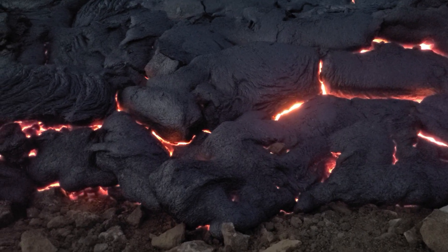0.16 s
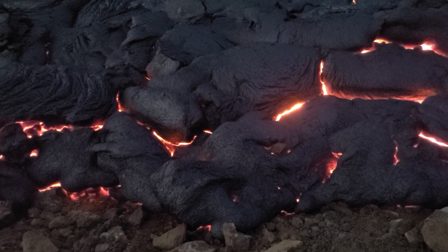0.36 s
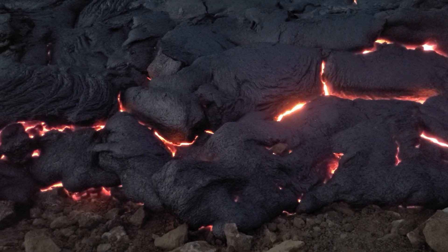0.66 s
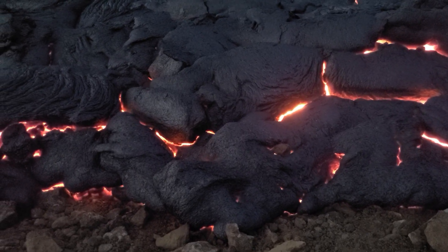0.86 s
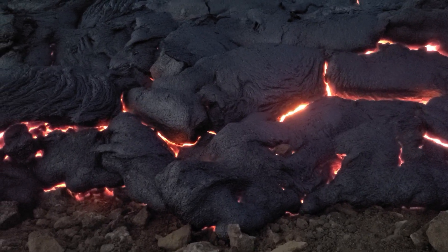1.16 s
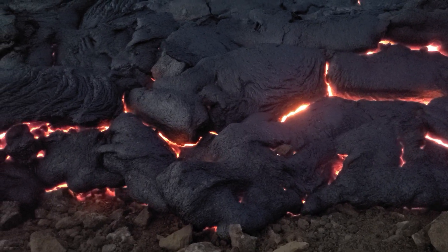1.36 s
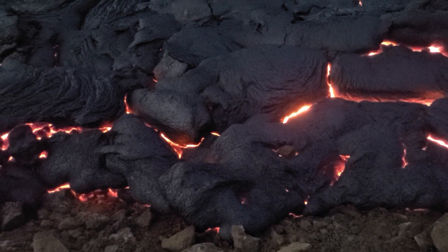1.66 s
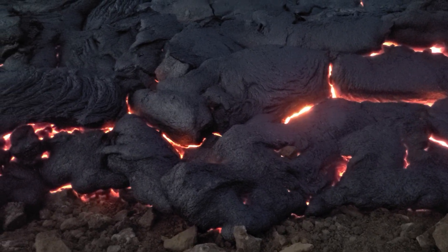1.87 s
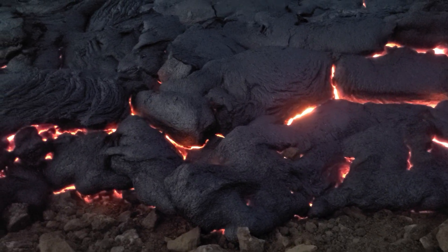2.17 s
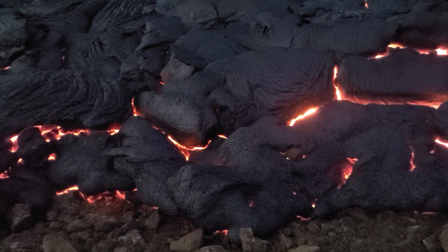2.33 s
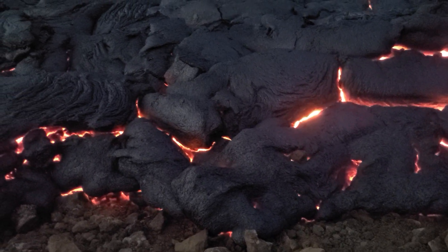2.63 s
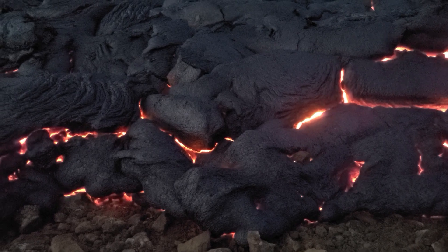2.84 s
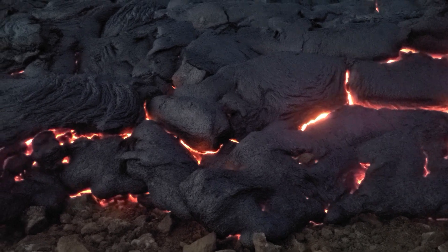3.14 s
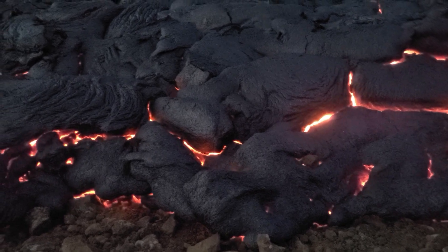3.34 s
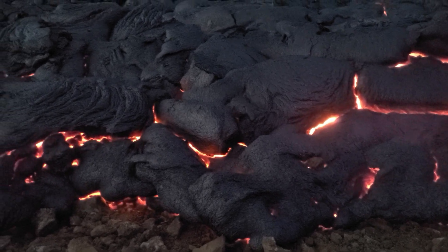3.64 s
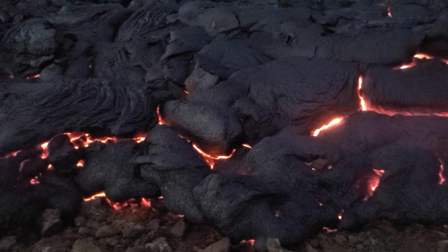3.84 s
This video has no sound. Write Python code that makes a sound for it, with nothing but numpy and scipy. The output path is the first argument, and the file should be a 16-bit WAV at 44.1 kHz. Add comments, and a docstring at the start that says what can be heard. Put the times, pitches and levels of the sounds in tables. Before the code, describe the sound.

Glassy lava flakes crack off with short bright ticks, the sharpest at 1.2 and 1.6 seconds, plus small dull crunches. Wind in the open air increasingly thumps the unshielded stereo microphone, roughest near the end.

```python
"""Wind rumbles gently on two microphone ports, over a faint hiss and a fine ticking. The glassy crust of
a slow lava flow is cooling in the open air: flakes snap off with short, bright pings, each a noise burst
with decaying partials, and thicker pieces crunch and knock. The wind is band-shaped noise that follows
level curves; its gusts grow rougher and brighter towards the end, with sharp eddies slapping the ports."""
import sys
import numpy as np
from scipy import signal
from scipy.fft import rfft, irfft, next_fast_len
from scipy.io import wavfile
from scipy.ndimage import uniform_filter1d, map_coordinates

SR = 44100
rng = np.random.default_rng(int(sys.argv[2]) if len(sys.argv) > 2 else 0)


def dump_mix(stems):
    """Bounce the given channels to the path in sys.argv[1] as a 16-bit WAV at rate SR."""
    frames = np.atleast_2d(stems).T  # one column per channel
    limited = np.clip(frames, -1, 1)  # hard clip at full scale
    pcm = np.round(limited * 32767).astype(np.int16)
    wavfile.write(sys.argv[1], SR, pcm)


N = 176400  # length in samples
TOP_HZ = 16200  # upper band limit of the recorder and of the ringing partials
WIND_ALIKE = 0.34  # sets the left-right correlation of the turbulence


def amp(db):
    """Logarithmic level: decibels become an amplitude gain."""
    return 10 ** (np.asarray(db) / 20)


def unit(x):
    """Power normalisation: x is scaled to an rms of 1."""
    return x / np.sqrt(np.mean(x ** 2) + 1e-20)


def pan(left_right_db):
    """Interaural level difference: half is given to the left gain and taken from the right."""
    return amp(np.vstack([left_right_db, -left_right_db]) / 2)


def curves(rows):
    """Linear interpolation: each column after the time becomes one value per sample."""
    time_s, *columns = np.transpose(rows)
    return [np.interp(np.arange(N) / SR, time_s, column) for column in columns]


def wobble(rate_hz):
    """Band-limited fluctuation: a smooth curve through rate_hz random knots a second."""
    knots = rng.standard_normal(int(N * rate_hz / SR) + 4)
    return map_coordinates(knots, [np.arange(N) * rate_hz / SR])


def filtered(x, response):
    """Linear filtering: the spectrum of x is multiplied by a response of frequency."""
    size = next_fast_len(N + SR // 2)
    spectrum = rfft(x, size) * response(np.fft.rfftfreq(size, 1 / SR))
    return irfft(spectrum, size)[..., :N]


def colour(x, spectrum):
    """Spectral shaping: levels are interpolated over log frequency, with silence outside the points."""
    points_hz, points_db = np.transpose(spectrum)

    def response(hz):
        return amp(np.interp(np.log(hz + 1), np.log(points_hz), points_db, left=-120, right=-120))

    return filtered(x, response)


def white(alike):
    """Partial coherence: a shared and an opposed white noise mix to a left-right correlation of alike."""
    shared, opposed = rng.standard_normal((2, N))
    turn = np.arccos(np.clip(alike, -1, 1)) / 2
    return np.cos(turn) * shared + np.sin(turn) * np.array([opposed, -opposed])


def noise(spectrum, alike):
    """Stationary random sound: coloured stereo noise of rms 1."""
    return unit(colour(white(alike), spectrum))


def add(track, start_s, sound):
    """Superposition: a sound is summed into the track at start_s."""
    part = track[:, max(round(start_s * SR), 0):][:, :sound.shape[-1]]
    part += sound[..., :part.shape[-1]]


def eddies(spectrum, even_s, lumps_db):
    """Turbulent pressure: one eddy size pushes lumpily on each port, of even strength over even_s."""
    pushes = unit(colour(white(WIND_ALIKE) * amp(lumps_db), spectrum))
    window = signal.windows.hann(int(even_s * SR))
    power = signal.fftconvolve(np.mean(pushes ** 2, axis=0), window, "same")
    return unit(pushes / np.sqrt(np.abs(power) + 1e-9))


# wind strength by eddy size, before the offsets below: time_s, rumble_db, buffet_db, flutter_db
WIND_LEVELS = [(0.0, -52.5, -67, -81), (0.659, -50.5, -72.5, -69.5), (0.733, -35.5, -62, -78),
               (0.773, -47, -62.5, -81), (1.187, -46.5, -66.5, -82), (1.212, -32, -67, -72.5),
               (1.322, -52.5, -70, -82.5), (1.412, -44, -63, -74), (1.482, -25.5, -31, -60.5),
               (1.576, -26, -43, -80), (1.601, -36, -59, -72), (1.691, -22, -43.5, -64),
               (1.746, -29.5, -40, -93.5), (1.881, -21.5, -43, -69.5), (1.906, -28, -25, -47.5),
               (1.985, -27.5, -36.5, -61.5), (2.075, -37, -30, -56), (2.115, -55, -44.5, -77.5),
               (2.15, -14, -27.5, -47.5), (2.19, -15.5, -37.5, -66.5), (2.235, -41, -67, -84),
               (2.27, -28.5, -21.5, -58), (2.31, -32.5, -58, -92), (2.365, -41.5, -30.5, -56),
               (2.424, -23.5, -25.5, -33), (2.444, -31.5, -30.5, -40), (2.559, -36.5, -31.5, -42.5),
               (2.609, -22.5, -40.5, -69), (2.669, -40.5, -67, -79.5), (2.704, -20, -49, -88),
               (2.748, -34, -54.5, -83), (2.81, -22, -24.5, -35), (2.835, -26, -34.5, -50.5),
               (2.868, -21.5, -29, -36.5), (2.903, -44, -60.5, -82), (2.958, -22.5, -33.5, -64),
               (2.998, -42.5, -42, -64), (3.053, -23, -33.5, -74), (3.148, -28.5, -38, -73),
               (3.193, -38.5, -50, -81), (3.223, -16, -41.5, -52), (3.283, -27, -49, -80),
               (3.372, -28.5, -40.5, -73), (3.408, -18, -18, -36.5), (3.456, -30.5, -28, -42),
               (3.49, -29, -39, -55.5), (3.562, -33, -20, -47), (3.582, -38, -42.5, -60.5),
               (3.607, -19, -20.5, -33), (3.665, -31, -27, -30), (3.705, -26.5, -30, -38),
               (3.735, -44, -16.5, -32), (3.785, -32.5, -26.5, -38.5), (3.851, -30, -33.5, -39.5),
               (3.875, -31, -21.5, -35), (3.926, -28.5, -31.5, -25), (3.986, -32, -25, -28)]
# wind veering from port to port: time_s, left_right_db
PORT_BALANCE = [(0.27, -2), (0.45, 4.5), (0.73, 1.5), (0.82, 10), (1.15, 10), (1.44, -6), (1.72, -10),
                (1.93, 1), (2.17, -4.5), (2.45, -0.5), (3.38, -4), (3.8, 0)]
# relative spectral density of the steady breeze, then of eddies from large to small: frequency_hz, density_db
BREEZE_SPECTRUM = [(15, -11.5), (35, -1), (60, 3), (100, -10.5), (200, -26.5), (400, -42.5)]
RUMBLE_SPECTRUM = [(22, -21), (42, -7.5), (60, -1), (100, -5.5), (150, -19.5), (230, -39.5), (400, -73.5)]
BUFFET_SPECTRUM = [(70, -19.5), (135, 2), (200, 6), (270, -3.5), (380, -30), (600, -54.5)]
CHURN_SPECTRUM = [(150, -32), (270, -1.5), (340, -0.5), (410, -5.5), (520, -27.5), (800, -65)]
FLUTTER_SPECTRUM = [(200, -28.5), (350, -2.5), (460, 3), (600, -5), (780, -12.5), (1000, -31), (1250, -34),
                    (1800, -49)]
BREEZE_DB = -44
RUMBLE_OFFSET_DB, BUFFET_OFFSET_DB, CHURN_OFFSET_DB, FLUTTER_OFFSET_DB = 1.5, 0.5, 0.5, -1.5


def wind():
    """Scales of turbulence: breeze and large eddies rumble throughout, smaller eddies join in the gusts."""
    rumble_db, buffet_db, flutter_db = curves(WIND_LEVELS)
    # churning eddies lie between buffeting and flutter in size and in level
    churn_db = (buffet_db + flutter_db) / 2
    # one part of the lumpiness is common to both ports, the other is separate
    lumps = unit(wobble(70) + np.array([wobble(140), wobble(140)]))
    rumble = amp(rumble_db + RUMBLE_OFFSET_DB) * eddies(RUMBLE_SPECTRUM, even_s=0.061, lumps_db=2.14 * lumps)
    buffet = amp(buffet_db + BUFFET_OFFSET_DB) * eddies(BUFFET_SPECTRUM, even_s=0.052, lumps_db=4.8 * lumps)
    churn = amp(churn_db + CHURN_OFFSET_DB) * eddies(CHURN_SPECTRUM, even_s=0.08, lumps_db=5.2 * lumps)
    flutter = amp(flutter_db + FLUTTER_OFFSET_DB) * eddies(FLUTTER_SPECTRUM, even_s=0.07, lumps_db=6.4 * lumps)
    breeze = amp(BREEZE_DB) * unit(colour(white(WIND_ALIKE) * amp(1.9 * lumps), BREEZE_SPECTRUM))
    side_db, = curves(PORT_BALANCE)
    # the larger the eddies, the further they veer
    large = pan(side_db) * (breeze + rumble)
    middle = pan(side_db / 2) * (buffet + churn)
    return large + middle + flutter


# slow course of the hiss: time_s, level_db
HISS_COURSE = [(0, -67), (3.05, -65.5), (3.25, -62.5), (4, -64)]
# relative spectral density of the hiss: frequency_hz, density_db
HISS_SPECTRUM = [(200, -3.5), (600, 11.5), (1500, 8), (2500, 3), (4200, 2), (6200, -9), (7300, -17.5),
                 (8600, -17), (9800, -7.5), (12000, -8), (15500, -14.5)]


def hiss():
    """Broadband flow noise: the faint, slightly unsteady rush of air over the lava field."""
    level_db, = curves(HISS_COURSE)
    return amp(level_db + 0.31 * wobble(5)) * noise(HISS_SPECTRUM, alike=0.077)


# relative spectral density of the ticks: frequency_hz, density_db
TICK_SPECTRUM = [(1500, -5), (4500, -2), (6200, 2), (7500, -15), (8700, -13), (10500, -3), (15500, -5)]
TICKS_PER_S, TICK_T60_S = 25, 0.023
WEAKEST_TICK_DB, TICK_SPREAD_DB = -72, 3.5


def ticking():
    """Random point process: many tiny fractures across the crust, each a decaying grain of noise."""
    strength, t = np.zeros((2, N)), np.arange(SR // 30) / SR
    grain = noise(TICK_SPECTRUM, alike=0.25)
    for when, size, side in rng.random((int(TICKS_PER_S * N / SR), 3)):
        # exponentially spread levels: most ticks are weak
        level_db = WEAKEST_TICK_DB + TICK_SPREAD_DB * min(-np.log(1 - size), 3)
        decay = amp(level_db - 60 * t / TICK_T60_S)
        add(strength, when * N / SR, pan(3 - 10 * side) * decay)
    return strength * grain


GROUND_DB, GROUND_T60_S = -16.5, 0.08


def ground(x):
    """Diffuse reflection: convolution with decaying noise gives a short scatter from the surrounding rock."""
    t = np.arange(SR // 4) / SR
    tail = rng.standard_normal((2, len(t))) * amp(-60 * t / GROUND_T60_S)
    return signal.fftconvolve(x, tail / np.linalg.norm(tail[0]), axes=1)[:, :N]


# flakes snapping off, levels relative: start_s, ring_db, pitch_hz, ring_t60_s, snap_db, left_right_db
FLAKE_CRACKS = [ (0.173, -56, 3300, 0.059, -75, 6.5), (0.4253, -61.5, 5440, 0.089, -86, -5),
                (0.5794, -51.5, 5970, 0.045, -52.5, -1.5), (0.828, -49, 1620, 0.094, -54, -1.5),
                (0.883, -43.5, 3130, 0.06, -50.5, -2), (0.885, -51, 2497, 0.067, -65, 3),
                (0.9896, -50.5, 6180, 0.022, -60, -10), (1.067, -57, 4500, 0.03, -59, -5),
                (1.2133, -39.5, 11100, 0.023, -28.5, -13.5), (1.594, -29.5, 4160, 0.031, -26.5, -7.5),
                (2.0513, -52.5, 5680, 0.024, -50, -8.5), (2.1215, -55.5, 8010, 0.05, -46.5, -11),
                (2.2705, -56, 4570, 0.054, -76, -1.5), (3.0499, -52, 5840, 0.066, -59, -3.5),
                (3.1227, -44.5, 4263, 0.04, -40.5, -8), (3.3617, -51.5, 3390, 0.022, -49, -13.5),
                (3.4334, -51.5, 4135, 0.071, -38.5, -8), (3.631, -52.5, 4190, 0.028, -48, -5.5),
                (3.6947, -50, 2926, 0.055, -45, -7), (3.723, -50, 3955, .025, -53, -4.5),
                (3.9141, -56, 3665, 0.026, -51.5, -14.5)]
# partials of a ringing flake: pitch_ratio, level_db (relative to the ring), t60_share
FLAKE_PARTIALS = [(0.548, -13.5, 1.7), (0.898, -15, 1.6), (1, 0.5, 0.85), (1.06, -7, 0.75),
                  (1.514, -4.5, 0.63), (2.65, -5.5, 0.28)]
# relative spectral density of the snap: frequency_hz, density_db
SNAP_SPECTRUM = [(700, -22), (2000, -8.5), (4000, 1), (6400, -2.5), (8000, -10), (10500, 0.5), (15000, -8)]
SNAP_T60_S = 0.02
SNAP_LOW_RATIO = 0.82  # low cut of the snap over the pitch of the flake
RING_ATTACK_S = 0.00089  # time constant of the onset, for ring and snap
RING_ROUGH = 0.49  # phase jitter, radians rms
OVERTONE_GROWTH = 0.9  # dB per octave for each dB of snap over ring
PORT_LEAD_S = 0.00004  # the ring's phase leads by this much at the right port


def cracks():
    """Impulse and modal decay: a fracture is a broad snap, and the freed flake rings at its own pitch."""
    out, t = np.zeros((2, N)), np.arange(SR // 8) / SR
    snaps = noise(SNAP_SPECTRUM, alike=0.95)
    port_t = t + PORT_LEAD_S * np.array([[0], [1]])
    onset = 1 - np.exp(-t / RING_ATTACK_S)
    for start_s, ring_db, pitch_hz, t60_s, snap_db, side_db in FLAKE_CRACKS:
        ring = np.zeros((2, len(t)))
        for ratio, partial_db, share in FLAKE_PARTIALS:
            partial_hz = pitch_hz * ratio
            grit = unit(uniform_filter1d(rng.standard_normal((2, len(t))), size=40, axis=1))
            phase = 2 * np.pi * (partial_hz * port_t + rng.random()) + RING_ROUGH * grit
            # a harder snap rings the overtones more
            bright_db = OVERTONE_GROWTH * (snap_db - ring_db) * max(np.log2(ratio), 0)
            decay = amp(ring_db + partial_db + bright_db - 60 * t / (t60_s * share))
            ring += (partial_hz < TOP_HZ) * decay * np.sin(phase)
        # each snap takes its own stretch of the noise, at half amplitude
        burst = np.roll(snaps, -round(start_s * SR), axis=1)[:, :len(t)]
        snap = burst * amp(snap_db - 60 * t / SNAP_T60_S) / 2
        # small flakes radiate no lows
        low_cut_hz = min(SNAP_LOW_RATIO * pitch_hz, TOP_HZ)
        snap = signal.sosfilt(signal.butter(2, low_cut_hz, "high", fs=SR, output="sos"), snap)
        add(out, start_s, pan(side_db) * (ring + snap) * onset)
    return out


# thicker pieces of crust giving way: start_s, level_db
CRUNCH_EVENTS = [(0.648, -54.5), (0.825, -54), (0.856, -52), (1.506, -57.5), (1.812, -58), (3.264, -49),
                 (3.277, -47), (3.3435, -42)]
# relative spectral density of the crumbling: frequency_hz, density_db
CRUNCH_SPECTRUM = [(600, -16.5), (1100, 4), (1450, 5.5), (2100, -2.5), (3200, -16), (6500, -25)]
CRUNCH_ATTACK_S, CRUNCH_T60_S = 0.00073, 0.035
KNOCK_HZ, KNOCK_DB, KNOCK_T60_S = 1388, -2.5, 0.025  # level relative to the crunch


def crunches():
    """Heavy damping: thick crust breaks with a dull noise burst and the short knock of one damped mode."""
    out, t = np.zeros((2, N)), np.arange(SR // 8) / SR
    grit = noise(CRUNCH_SPECTRUM, alike=0.81)
    knock = amp(KNOCK_DB - 60 * t / KNOCK_T60_S) * np.sin(2 * np.pi * KNOCK_HZ * t)
    onset = 1 - np.exp(-t / CRUNCH_ATTACK_S)
    for start_s, level_db in CRUNCH_EVENTS:
        burst = np.roll(grit, -round(start_s * SR), axis=1)[:, :len(t)]
        crumble = burst * amp(-60 * t / CRUNCH_T60_S)
        add(out, start_s, amp(level_db) * (knock + crumble) * onset)
    return out


# sharp eddies that tear across the ports: start_s, level_db, left_right_db
SLAP_EVENTS = [(2.484, -37, 0), (3.631, -27, 0.5), (3.723, -22, -3), (3.732, -21, 7), (3.748, -16.5, -11),
               (3.775, -26.5, -1), (3.794, -27.5, 11), (3.816, -32.5, -11.5), (3.837, -33, -11),
               (3.868, -21.5, 17), (3.875, -28, -13.5), (3.929, -34, 3)]
# relative spectral density of the tearing air: frequency_hz, density_db
TEARING_SPECTRUM = [(150, -14), (400, 5), (780, -7.5), (1200, -14), (1700, -30), (2500, -43.5),
                    (5000, -59.5)]
SLAP_ATTACK_S, SLAP_T60_S = 0.001, 0.061


def slaps():
    """Transient turbulence: sharp eddies, mostly stronger on one port, thump roughly and die away."""
    strength, t = np.zeros((2, N)), np.arange(SR // 8) / SR
    onset = 1 - np.exp(-t / SLAP_ATTACK_S)
    for start_s, level_db, side_db in SLAP_EVENTS:
        decay = amp(level_db - 60 * t / SLAP_T60_S)
        add(strength, start_s, pan(side_db) * decay * onset)
    return strength * eddies(TEARING_SPECTRUM, even_s=0.0074, lumps_db=9 * wobble(400))


def scene():
    """Superposition of sources: wind and hiss around the crackling crust, which the ground scatters."""
    air = wind() + slaps() + hiss()
    crust = cracks() + crunches() + ticking()
    return air + crust + amp(GROUND_DB) * ground(crust)


def record(dry):
    """Band limiting: the recorder cuts the deepest bass and keeps nothing from TOP_HZ upwards."""
    low_cut = signal.butter(2, 21, "high", fs=SR, output="sos")  # corner in Hz
    return filtered(signal.sosfilt(low_cut, dry), lambda hz: hz < TOP_HZ)


dry = scene()
out = record(dry)
dump_mix(out)
```